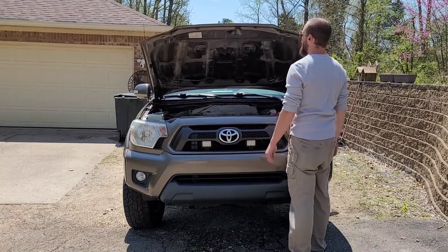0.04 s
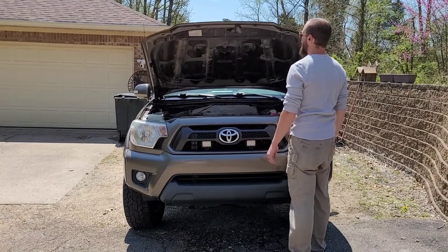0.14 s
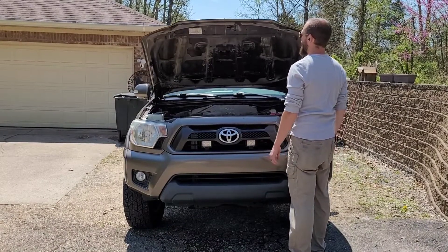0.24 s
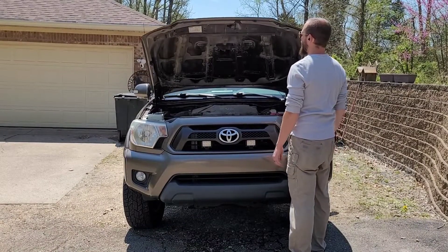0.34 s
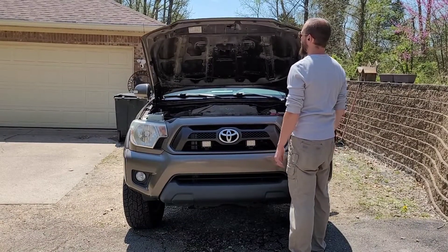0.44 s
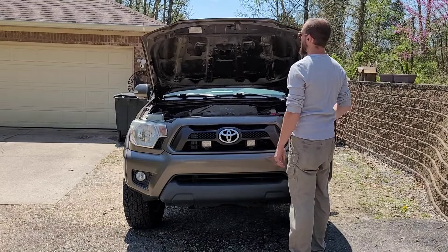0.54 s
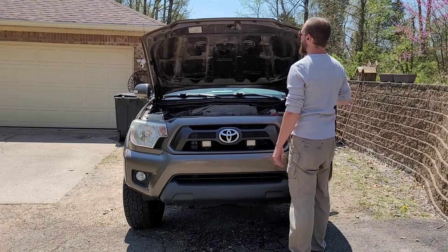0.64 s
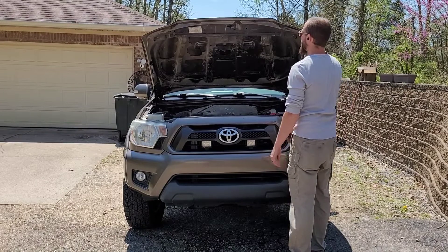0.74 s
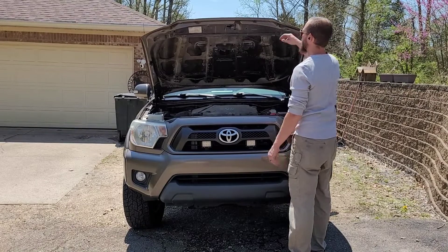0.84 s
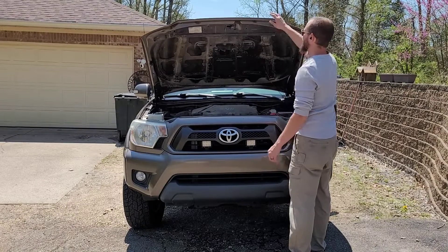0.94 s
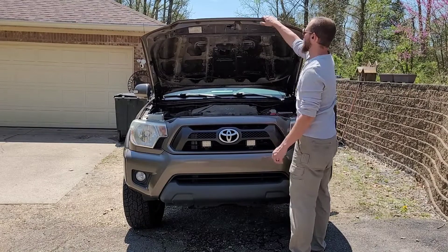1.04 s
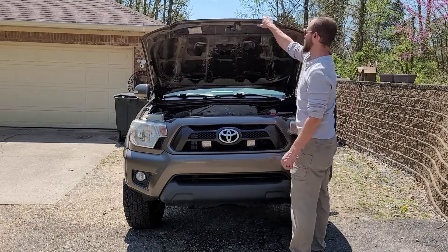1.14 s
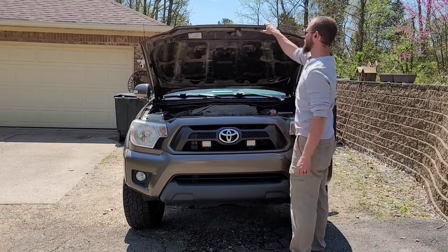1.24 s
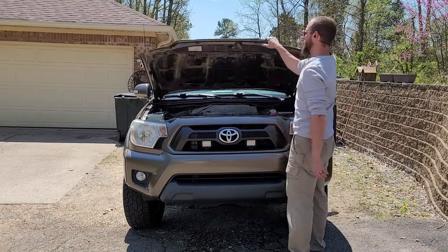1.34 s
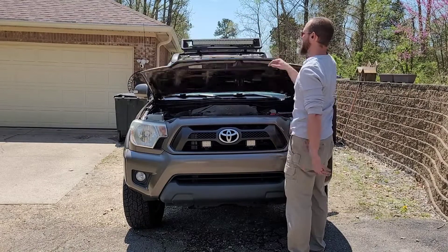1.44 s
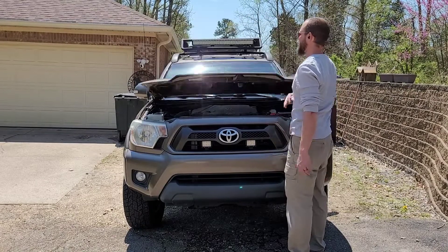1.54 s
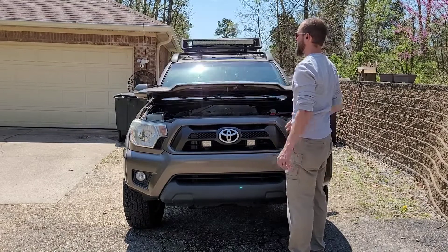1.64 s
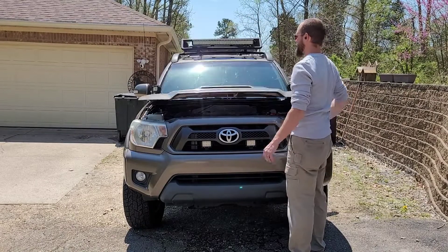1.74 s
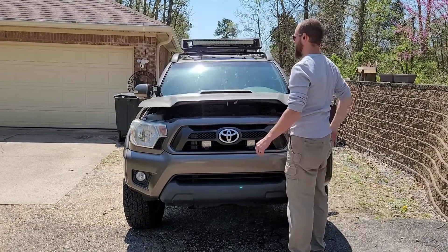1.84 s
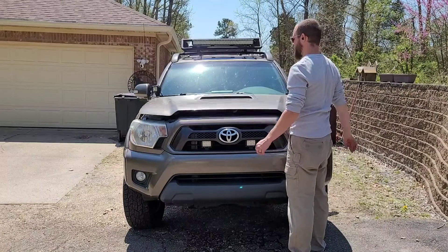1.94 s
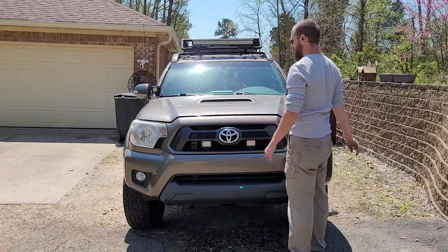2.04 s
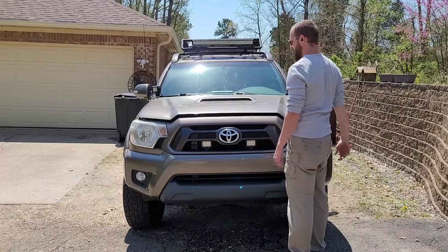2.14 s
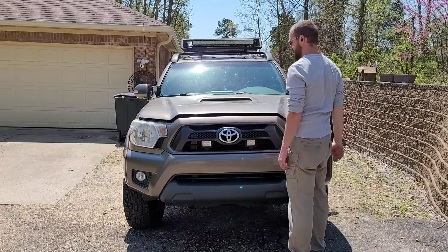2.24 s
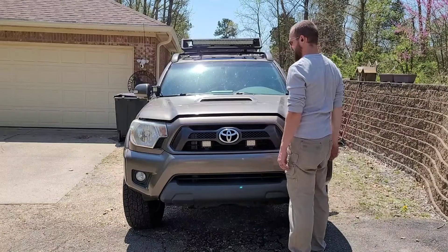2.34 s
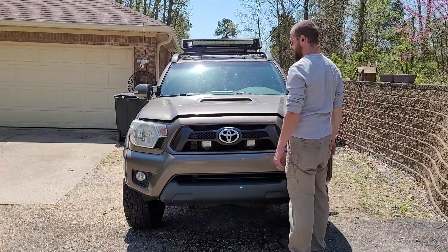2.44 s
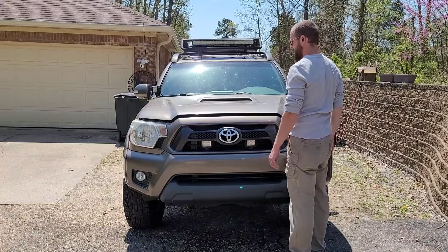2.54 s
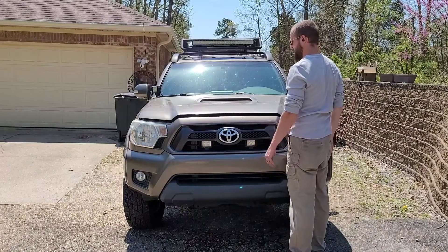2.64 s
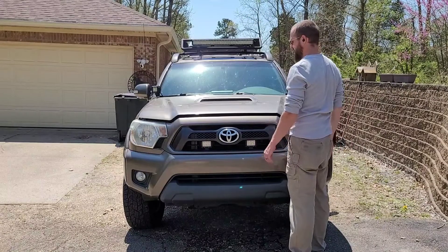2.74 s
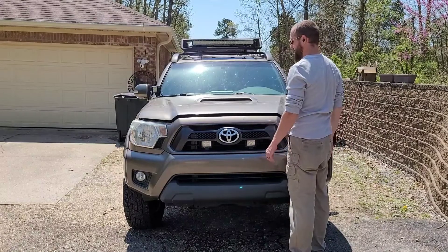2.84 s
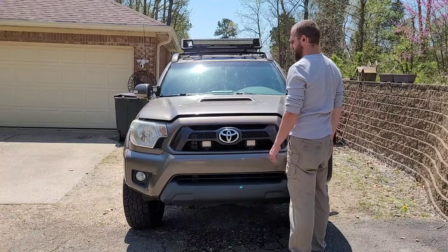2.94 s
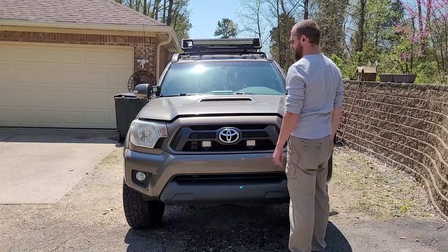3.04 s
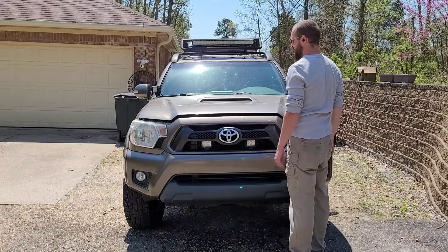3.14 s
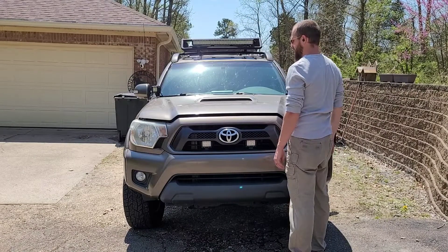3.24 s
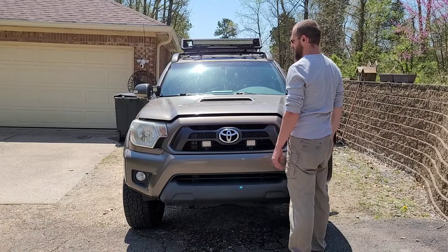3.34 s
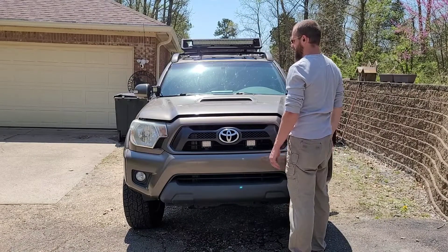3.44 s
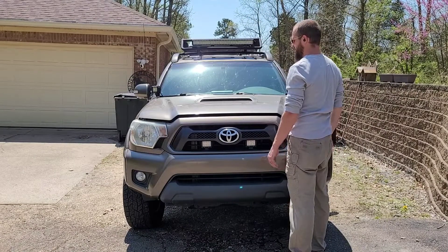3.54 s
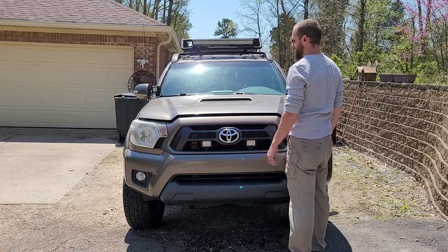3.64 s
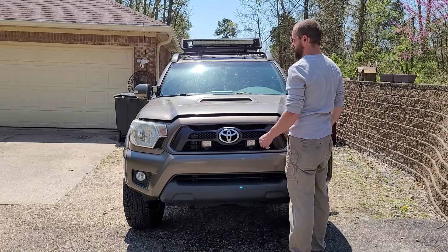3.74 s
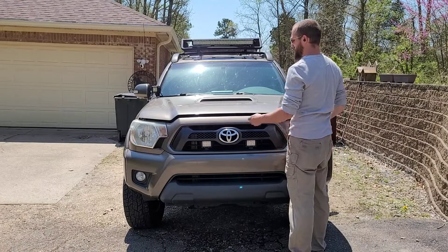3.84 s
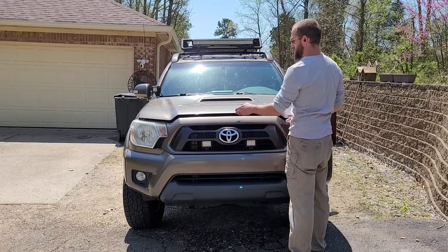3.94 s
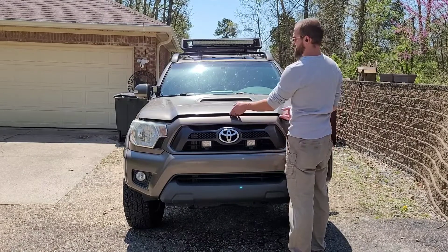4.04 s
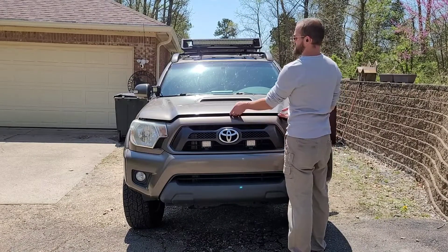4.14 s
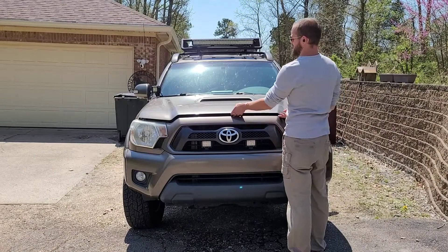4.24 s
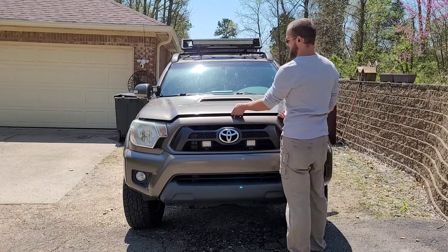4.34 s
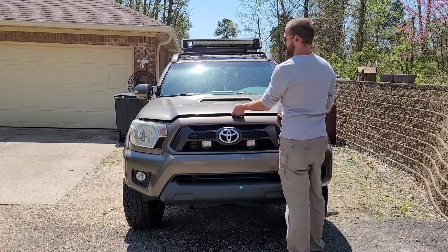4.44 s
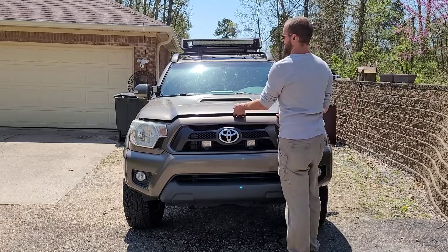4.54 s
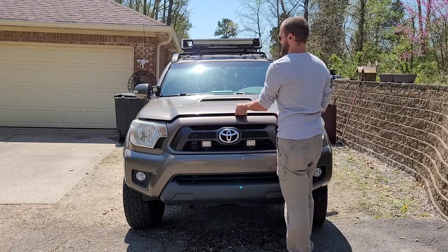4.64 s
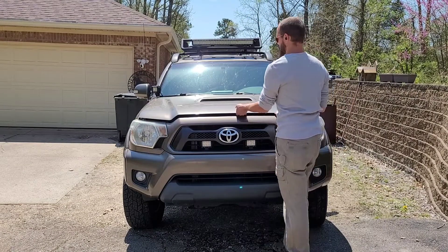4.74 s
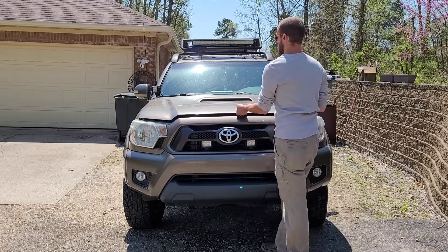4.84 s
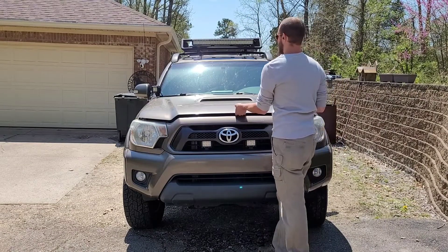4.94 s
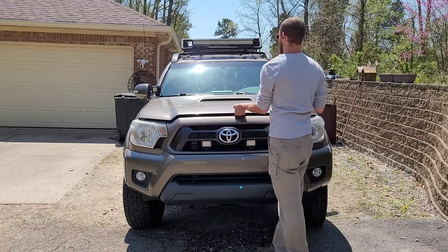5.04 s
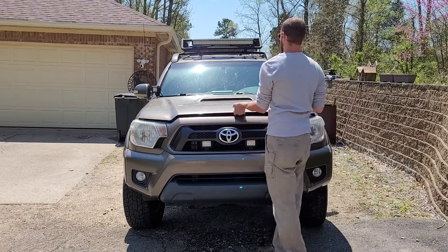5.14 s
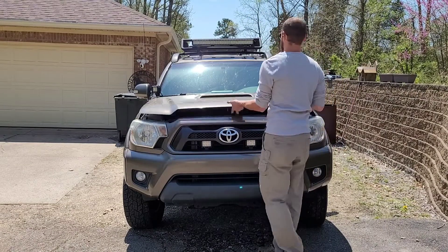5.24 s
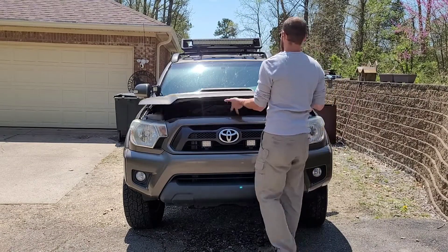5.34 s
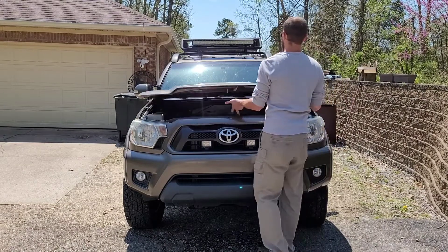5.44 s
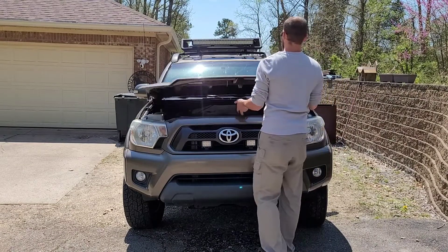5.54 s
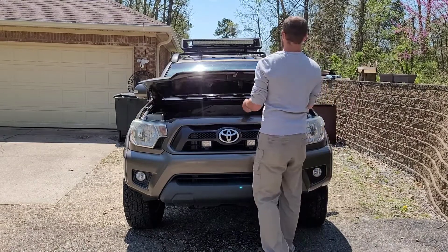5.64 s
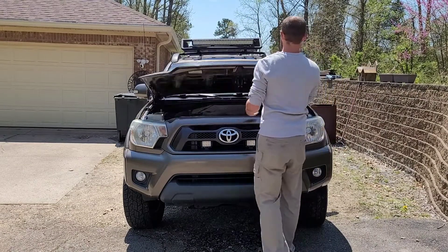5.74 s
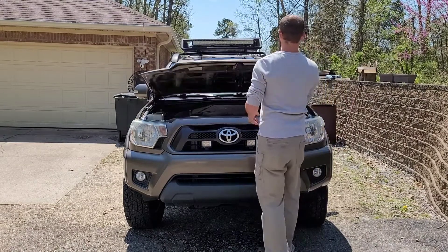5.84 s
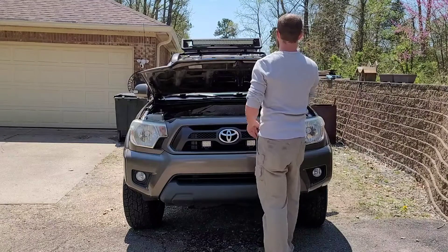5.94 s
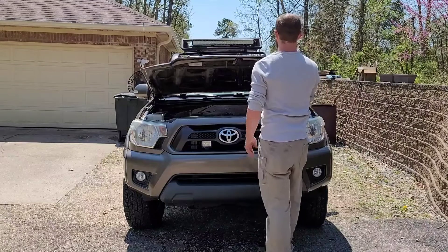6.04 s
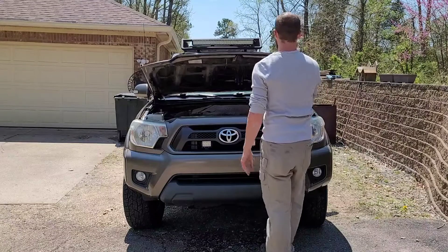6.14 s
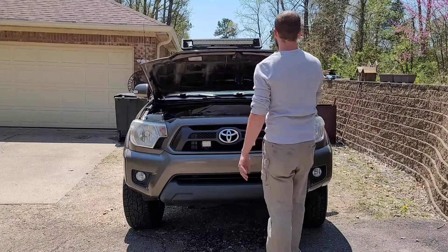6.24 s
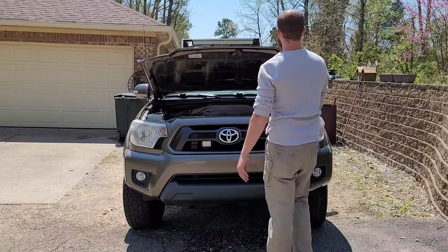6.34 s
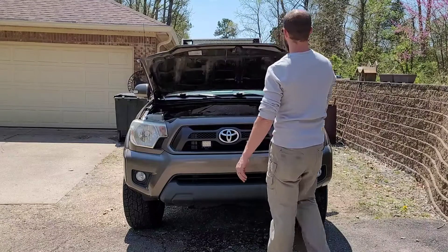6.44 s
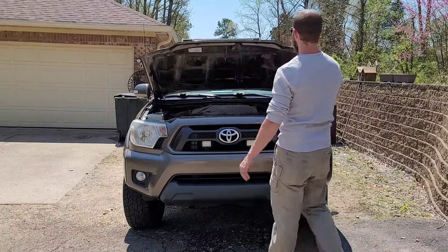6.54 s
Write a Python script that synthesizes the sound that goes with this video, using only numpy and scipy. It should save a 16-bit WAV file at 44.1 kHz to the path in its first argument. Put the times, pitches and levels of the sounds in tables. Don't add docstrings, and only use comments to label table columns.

```python
import sys
import numpy as np
from scipy import signal
from scipy.fft import rfft, irfft, next_fast_len
from scipy.io import wavfile
from scipy.ndimage import uniform_filter1d

SR = 44100
rng = np.random.default_rng(int(sys.argv[2]) if len(sys.argv) > 2 else 0)


def invert_db(level):
    return 10 ** (np.asarray(level, dtype=float) / 20)


def output_pcm(signal):
    pcm = np.clip(np.atleast_2d(signal).T, -1, 1) * 32767
    wavfile.write(sys.argv[1], SR, np.round(pcm).astype(np.int16))


N = 291314

BANDS_HZ = 22 * 2 ** np.arange(0, 9.6, 1 / 2)
# pitch_hz, likeness (1 = same, -1 = opposed)
ALIKE_NEAR = [(30, .97), (150, .95), (290, .85), (560, .2), (1400, .45), (3100, .55), (7000, .75),
              (16000, .85)]


def on_log(table, hz):
    f, v = np.transpose(table)
    return np.interp(np.log(hz), np.log(f), v)


def walk(rate):
    k = int(SR / rate)
    held = np.repeat(rng.standard_normal(N // k + 1), k)
    return 1.3 * uniform_filter1d(uniform_filter1d(held, k), k)[:N]


def band_noise():
    size = next_fast_len(N)
    hz = np.maximum(np.arange(size // 2 + 1) * SR / size, 1.)
    white = rfft(rng.standard_normal((2, size))) * np.sqrt(SR / 2)
    shape = [np.cos(np.pi / 2 * np.clip(2 * np.log2(hz / c), -1, 1)) for c in BANDS_HZ]
    return np.array([irfft(s * white, size)[:, :N] for s in shape])


def ports(bands, alike):
    like = np.clip(on_log(alike, BANDS_HZ), -1, 1)[:, None]
    mid = bands[:, 0] * np.sqrt((1 + like) / 2)
    side = bands[:, 1] * np.sqrt((1 - like) / 2)
    return np.stack([mid + side, mid - side], axis=1)


def coloured(noise, colour, flicker_db, rate):
    out = sum(invert_db(on_log(colour, hz) + flicker_db * walk(rate)) * n for hz, n in zip(BANDS_HZ, noise))
    return out / np.sqrt(np.mean(out ** 2))


def swells(start_s, hold_s, fade_db_s, db, still_db):
    t = np.arange(N)[:, None] / SR
    away_s = np.maximum(start_s - t, 0) + np.maximum(t - start_s - np.abs(hold_s), 0)
    return np.sqrt((invert_db(db - fade_db_s * away_s) ** 2).sum(axis=1) + invert_db(still_db) ** 2)


def pan(pan_db):
    return invert_db(np.array([[pan_db], [-pan_db]]) / 2)


def decay(t, t60):
    return np.exp(-np.log(1000) * t / t60)


def rattle_contacts(rattle_s, scatter_db, first):
    count = 7000
    chance = rng.random((3, count))
    u = np.arange(count) / SR / max(rattle_s, .0002)
    uneven = invert_db(-scatter_db * np.log(chance[2] + 0.0057))
    contacts = (chance[0] < .03) * np.sign(chance[1] - .5) * uneven
    contacts[0] = 1
    contacts = contacts * (u + first) * np.exp(-2 * u) * (u < 4)
    return contacts / np.sqrt(np.sum(contacts ** 2))


def blows(noise, events, colour, ring, modes, modes_db, scatter_db, first, pan_db, rattle=0., soft=0.):
    out, t = np.zeros((2, N)), np.arange(int(.6 * SR)) / SR
    fade = decay(t, np.maximum(on_log(ring, BANDS_HZ), .004)[:, None])
    fade = fade * (1 - np.exp(-(t + 1 / SR) * BANDS_HZ[:, None] * 5.8))
    splits_hz = [250, 3000]
    part = np.digitize(BANDS_HZ, splits_hz)
    for s, db, bass_db, treble_db, *drag_s in events:
        rattle_s = drag_s[0] if drag_s else rattle * invert_db(-soft * treble_db)
        start = rng.integers(0, N - len(t))
        grains = noise[:, :, start:start + len(t)]
        dense = invert_db(on_log(colour, BANDS_HZ))[:, None, None] * fade[:, None] * grains
        body = np.array([dense[part == k].sum(axis=0) for k in range(3)])
        size = np.sqrt(np.mean(body.sum(axis=0)[:, :800] ** 2))
        rings = np.zeros_like(body)
        for (hz, mode_db, t60), (tune, phase, lead) in zip(modes, rng.standard_normal((len(modes), 3))):
            out_of_step = np.array([[1], [-1]]) * lead * (1 - on_log(ALIKE_NEAR, hz))
            turn = 2 * np.pi * hz * (1 + 0.0034 * tune) * t + phase + out_of_step
            rings[np.digitize(hz, splits_hz)] += size * invert_db(mode_db + modes_db) * np.sin(turn) * decay(t, t60)
        contacts = rattle_contacts(rattle_s, scatter_db, first)
        sound = signal.fftconvolve(body, contacts[None, None], axes=2)[:, :, :len(t)]
        sound = sound + rings * (1 - np.exp(-t / rattle_s * 3.4))
        peak = np.sqrt(uniform_filter1d(sound.mean(axis=1) ** 2, size=400, axis=1).max(axis=1))
        sound = np.tensordot(invert_db(db + np.array([bass_db, 0, treble_db])) / peak, sound, axes=1)
        i = int(s * SR)
        out[:, i:i + len(t)] += (sound * pan(pan_db))[:, :N - i]
    return out


def glides(table, rough, overtones_db=(0,), wobble=0.034, flutter_db=3.5, lead=0., trill_depth=0.):
    trill_per_s = 47
    out, drift, flutter, rasp = np.zeros((2, N)), walk(150), walk(50), walk(400)
    for s, length, first_hz, last_hz, db in table:
        i, u = int(s * SR), np.linspace(0, 1, int(length * SR))
        at = slice(i, i + len(u))
        hz = (last_hz + (first_hz - last_hz) * (1 - u) ** 1.8) * (1 + wobble * rough * drift[at])
        hz = hz * (1 - trill_depth * np.cos(2 * np.pi * trill_per_s * length * u))
        unsteady = (rough + 0.5965) * flutter[at] + rough * rasp[at]
        gain = np.sqrt(2) * np.sin(np.pi * u) ** .5 * invert_db(db + flutter_db * unsteady)
        turn = 2 * np.pi * np.cumsum(hz) / SR
        for k, over_db in enumerate(overtones_db):
            out[:, at] += gain * invert_db(over_db) * np.sin((k + 1) * turn + [[lead], [0]])
    return out


def scattered(x, noise, pan_db, wet_db, t60):
    t = np.arange(int(.7 * SR)) / SR
    damped = t60 * np.minimum(2500 / BANDS_HZ, 1)[:, None, None] ** 0.31
    echo = (noise[:, :, :len(t)] * decay(t, damped)).sum(axis=0) * np.minimum(t / 0.014, 1)
    echo = echo / np.sqrt((echo ** 2).sum(axis=1, keepdims=True))
    echo = signal.fftconvolve(x[:1], echo, axes=1)[:, :N]
    return x * pan(pan_db) + invert_db(wet_db) * echo


def hood_slam(noise):
    # start_s, level_db (peak 250-3000 Hz), bass_db below it, treble_db above it
    catch_hits = [
        (1.955, -20, -19, -9),
        (1.966, -20.5, -15, -12),
    ]
    slam_hits = [(1.982, -14.5, -14, -1), (1.992, -12, -8.5, -7.5), (2.003, -14.5, -5.5, -12.5),
                 (2.015, -17.5, -4, -12.5), (2.031, -25.5, 4, -16.5), (2.054, -25, -9.5, -10.5),
                 (2.074, -25, -7, -6.5), (2.09, -29.5, -2, -12.5)]
    rebound_hits = [
        (2.158, -25, -6, -3.5),
        (2.168, -26.5, -2, -9.5),
        (2.19, -29.5, -1.5, -19.5),
        (2.222, -34, 0, -20),
        (2.246, -37, 5, -19),
    ]
    # pitch_hz, level_db per Hz; then pitch_hz, t60_s
    steel_colour = [(25, -14), (98, -6.5), (300, -17.5), (380, -6), (620, -17), (950, -7.5), (1400, -13),
                    (3980, -17.5), (6800, -33), (9000, -22.5), (16000, -43)]
    steel_ring = [(40, 0.21), (150, .5), (700, 0.15), (1500, 0.12), (5000, 0.033), (15000, 0.046)]
    # pitch_hz, level_db, t60_s
    catch_modes = [(380, 6.5, 0.21), (486, 0.5, .1), (1310, 5, .12), (3920, -1.5, 0.1), (5550, -8, .05)]
    slam_modes = [(60, 3, 0.25), (98, 1, 0.3), (146, 0, 0.5), (377.7, 10, .16), (470, 0, 0.18),
                  (541, -1, 0.16), (889, -1, .3), (1030, -1, .15), (1640, -5, .1), (2250, -6, .08),
                  (3490, -10, .1), (8420, -17, .05), (9450, -16, .06), (11800, -18, .06)]
    rebound_modes = [(100.6, -2.5, 0.27), (144.8, -1, 0.46), (368, 7.5, 0.31), (469, -4, .3),
                     (618.3, -3.5, .1), (752, -3, 0.28), (896, 3.5, 0.24), (980, -6, 0.34),
                     (1076, -18, 0.35), (1385, -13, 0.33), (1575, -11.5, 0.12), (2300, -8, 0.07)]
    slam = blows(noise, slam_hits, steel_colour, steel_ring, slam_modes, modes_db=-6.0,
                 scatter_db=1.5, first=0.13, rattle=0.0083, soft=0.12, pan_db=-0.14)
    catch = blows(noise, catch_hits, steel_colour, steel_ring, catch_modes, modes_db=-5.0,
                  scatter_db=2.5, first=0.14, rattle=0.0053, pan_db=0.46)
    rebound = blows(noise, rebound_hits, steel_colour, steel_ring, rebound_modes, modes_db=-4.0,
                    scatter_db=2.5, first=0.11, rattle=.007, soft=.3, pan_db=0.57)
    return slam + catch + rebound


def far_thud(noise):
    # start_s, level_db (peak 250-3000 Hz), bass_db below it
    thud_hits = [
        (0.294, -44, -9),
        (0.304, -35.5, -13),
        (0.321, -33.5, -4.5),
        (0.372, -38.5, 0.5),
        (0.429, -48.5, 3.5),
    ]
    # pitch_hz, level_db per Hz; pitch_hz, t60_s; modes pitch_hz, level_db, t60_s
    thud_colour = [(18, -26), (30, 5.5), (134, 0.5), (239, -8), (328, -8), (760, -18.5), (988, -16),
                   (2170, -30.5), (2610, -39), (16000, -131)]
    thud_ring = [(40, 0.7), (300, 0.57), (1500, 0.39), (15000, 0.071)]
    thud_modes = [(49.3, -1, 1), (91.3, -2, 0.37), (330.6, 5, 0.15), (610, -14.5, 0.37), (949, -13.5, 0.27),
                  (1340, -2, 0.068), (1725, -6.5, 0.044)]
    treble_db = -33.5
    return blows(noise, [(*row, treble_db) for row in thud_hits], thud_colour, thud_ring, thud_modes,
                 modes_db=0.5, scatter_db=1.5, first=0.066, rattle=0.013, pan_db=0.0)


def hood_pull(noise):
    # start_s, level_db (peak 250-3000 Hz), bass_db, treble_db
    pull_hits = [
        (1.061, -35, -8, -18),
        (1.071, -30, -13, -24.5),
        (1.082, -30, -21, -26.5),
        (1.149, -46, -5, -56),
    ]
    # pitch_hz, level_db per Hz; pitch_hz, t60_s; modes pitch_hz, level_db, t60_s
    pull_colour = [(18, -37), (30, -9), (184, -23), (227, -19), (273, -11), (554, -3.5), (937, -13),
                   (1430, -13.5), (1910, -21.5), (16000, -37.5)]
    pull_ring = [(40, 0.61), (600, 0.32), (1500, 0.21), (4000, 0.079), (15000, 0.1456)]
    pull_modes = [(285, -11, 0.25), (538, -4.5, 0.13), (689, 4, 0.26), (1200, -15, 0.083), (1292, -2, 0.15),
                  (1460, -4.5, 0.098), (3960, -1.5, 0.061)]
    return blows(noise, pull_hits, pull_colour, pull_ring, pull_modes, modes_db=2.0,
                 scatter_db=1.5, first=0.076, rattle=0.0045, soft=0.29, pan_db=0.5)


def latch_work(noise):
    # start_s, level_db (peak 250-3000 Hz), bass_db, treble_db
    clunk_hits = [
        (4.95, -40, -15.5, -21),
        (4.976, -51.5, 3, -35),
        (5.094, -44.5, -0.5, -17.5),
        (5.119, -53, -4, -19),
    ]
    latch_hits = [
        (5.467, -25, -9.5, -13.5),
        (5.475, -22.5, -13, -21),
        (5.487, -28, -9, -22),
        (5.51, -41.5, 8, -33),
    ]
    # pitch_hz, level_db per Hz (clunk, release); pitch_hz, t60_s; modes pitch_hz, level_db, t60_s
    clunk_colour = [(40, -20), (100, -8), (200, -12), (350, 0), (900, -2), (2500, -6), (4500, -19),
                    (16000, -42)]
    latch_colour = [(40, -35), (100, -22), (230, -9), (420, -1), (800, -12), (1300, -8), (2900, -9),
                    (4600, -24), (16000, -36)]
    latch_ring = [(40, 0.47), (300, 0.36), (1000, 0.084), (4000, 0.036), (15000, 0.074)]
    latch_modes = [(229, -2, .2), (317, -6, .15), (413, 4, .12), (488, 2, .14), (535, 2, .24),
                   (691, 0, .11), (1298, -7, .09), (2093, -8, .07), (2882, -8, .08), (3820, -16, .05),
                   (6700, -22, .15)]
    clunk = blows(noise, clunk_hits, clunk_colour, latch_ring, latch_modes, modes_db=-3.5,
                  scatter_db=3.0, first=0.31, rattle=0.017, pan_db=-1.0)
    release = blows(noise, latch_hits, latch_colour, latch_ring, latch_modes, modes_db=0.0,
                    scatter_db=2.5, first=0.054, rattle=0.0071, pan_db=-1.5)
    return clunk + release


def fingers_and_hinges(noise):
    # start_s, level_db (peak 250-3000 Hz), treble_db above it
    finger_taps = [(4.017, -52.5, -23.5), (4.096, -64, -24.5), (4.177, -46.5, -20.5), (4.19, -42, -8.5),
                   (4.219, -53, -37), (4.452, -58.5, -0.5), (4.472, -49.5, -12), (4.524, -56, -16),
                   (4.555, -55, -7), (4.608, -58, -8.5), (5.237, -60.5, -3.5), (5.263, -65, 0.5),
                   (5.385, -57.5, 2.5), (5.402, -51, 2.5), (5.441, -57, 4.5), (5.618, -62.5, -2.5)]
    # start_s, level_db (peak 250-3000 Hz), bass_db, treble_db, drag_s
    drags = [
        (0.669, -62.5, -12, -13.5, 0.018),
        (1.364, -50.5, -23, -2.5, 0.05),
        (1.402, -50.5, -13, -13, 0.047),
        (1.496, -55.5, -16, -30, 0.028),
        (4.822, -69, -1, -11.5, 0.054),
        (5.72, -62.5, -2, -7.5, 0.072),
        (6.329, -66, -10, -4, 0.015),
    ]
    # pitch_hz, level_db per Hz (fingers, drags); pitch_hz, t60_s; modes pitch_hz, level_db, t60_s
    finger_colour = [(18, -45.5), (30, -32), (75, 26), (311, -21.5), (584, -1), (684, -18), (866, 1),
                     (1190, -21), (2750, 1), (16000, -29)]
    drag_colour = [(30, -13), (300, -11.5), (1000, -12.5), (1900, -4.5), (3500, -6.5), (8000, -19.5),
                   (16000, -16)]
    finger_ring = [(40, 0.44), (600, 0.087), (3000, 0.012), (15000, 0.011)]
    finger_modes = [(557.4, 0.5, 0.13), (868, -3.5, 0.11), (1402, 12, 0.032), (2704, 7.5, 0.045),
                    (3840, 5.5, 0.038)]
    bass_db = -69
    touches = [(s, db, bass_db - db, treble_db) for s, db, treble_db in finger_taps]
    dragging = blows(noise, drags, drag_colour, finger_ring, [], modes_db=0,
                     scatter_db=2.0, first=0.097, pan_db=0.37)
    tapping = blows(noise, touches, finger_colour, finger_ring, finger_modes, modes_db=-16.0,
                    scatter_db=3.5, first=0.26, rattle=0.0153, soft=0.034, pan_db=0.0)
    return dragging + tapping


def gravel(noise):
    # start_s, level_db (peak 250-3000 Hz), bass_db, treble_db
    stone_hits = [
        (6.539, -54, -5.5, -7),
        (6.543, -58, 18, 1),
        (6.563, -53.5, -1, -2),
        (6.5691, -57.5, 11, 17.5),
        (6.577, -60.5, 12.5, 16),
    ]
    # pitch_hz, level_db per Hz; pitch_hz, t60_s
    stone_colour = [(18, -25.5), (30, 10), (199, -33), (1320, -29), (1720, -31), (8980, -13), (16000, -29)]
    stone_ring = [(40, 0.17), (1000, 0.028), (4000, 0.0072), (15000, 0.0016)]
    return blows(noise, stone_hits, stone_colour, stone_ring, [], modes_db=0,
                 scatter_db=3.0, first=0.87, rattle=0.0078, soft=1.0, pan_db=-5.5)


def struts_and_bird_call():
    # start_s, length_s, first_hz, last_hz, level_db (rms)
    squeaky_calls = [
        (4.095, .085, 1120, 1170, -67),
        (4.38, .1, 1130, 1160, -78),
    ]
    groans = [(1.4, .16, 1190, 1140, -57), (1.58, .05, 1130, 1130, -65), (1.5, .13, 770, 760, -62),
              (1.37, .09, 1800, 1760, -58), (1.47, .07, 2050, 1930, -63), (1.24, .07, 2900, 2950, -67),
              (1.39, .09, 3300, 3260, -65), (1.52, .08, 3800, 3780, -70), (1.21, .06, 1320, 1310, -63),
              (1.2, .08, 2580, 2620, -69), (4.82, .05, 1750, 1751, -73), (4.52, .04, 850, 840, -62),
              (4.6, .035, 1080, 1070, -68), (4.2, .06, 580, 620, -59), (5.51, .11, 2830, 2810, -62),
              (5.66, .04, 2810, 2810, -70), (5.52, .07, 1600, 1660, -63), (5.61, .05, 2200, 2030, -67),
              (5.68, .06, 2050, 2030, -72), (5.66, .06, 1640, 1640, -71), (5.74, .05, 3150, 3300, -70)]
    call_overtones_db = [-4, 4, -2, -36]
    return glides(squeaky_calls, 0.34, call_overtones_db) + glides(groans, rough=.2)


def truck(noise):
    hits = hood_slam(noise) + far_thud(noise) + hood_pull(noise)
    hits = hits + latch_work(noise) + fingers_and_hinges(noise) + gravel(noise)
    return scattered(hits + struts_and_bird_call(), noise, pan_db=-0.5, wet_db=-20, t60=0.4)


def whistling_birds():
    # start_s, length_s, first_hz, last_hz, level_db (rms)
    chirps = [(.0, .2, 2460, 2760, -59), (.0, .13, 2330, 2560, -63), (.0, .07, 1020, 1021, -62),
              (.04, .12, 1880, 2050, -65), (.235, .03, 3530, 3550, -65), (.39, .09, 2620, 2720, -62),
              (.52, .09, 2040, 2050, -70), (.03, .04, 2930, 2920, -70), (2.75, .04, 3100, 3400, -74),
              (3.04, .03, 3280, 3350, -76), (3.05, .07, 2950, 3000, -75), (3.07, .04, 2600, 2500, -74),
              (4.13, .04, 2780, 2850, -65), (4.08, .04, 2550, 2560, -70), (3.69, .04, 2230, 2230, -72)]
    # start_s, level_db (rms)
    whistle_shape = (.25, 2280, 2770)
    whistle_calls = [
        (.29, -58),
        (2.3, -66),
        (2.65, -65),
    ]
    low_shape = (.09, 1430, 1720)
    low_calls = [
        (2.35, -72),
        (2.65, -73),
        (2.94, -72),
    ]
    # start_s (after its beginning), length_s, first_hz, last_hz, level_db (rms)
    phrase_notes = [
        (0, .11, 2500, 2620, -77),
        (.04, .07, 3330, 3480, -72),
        (.1, .055, 3380, 3540, -68),
        (.12, .035, 2900, 3020, -81),
        (.18, .07, 2920, 3030, -73),
        (.24, .06, 2250, 2240, -74),
    ]
    repeats_db = [-5.5, -3.5, 1, 2.5, 2]
    phrase_start_s, phrase_every_s = 3.138, .298
    phrases = []
    for k, loud_db in enumerate(repeats_db):
        for s, *shape, db in phrase_notes:
            phrases.append((phrase_start_s + k * phrase_every_s + s, *shape, db + loud_db))
    calls = [(s, *whistle_shape, db) for s, db in whistle_calls]
    calls = calls + [(s, *low_shape, db) for s, db in low_calls] + chirps
    return (invert_db(3.5) * glides(calls, rough=0.13, wobble=0.079, lead=2.15)
            + invert_db(3.0) * glides(phrases, rough=0.303, wobble=0.0575, lead=1.5))


def trilling_birds():
    # start_s, length_s, first_hz, last_hz, level_db (rms)
    trilled = [
        (3.06, .13, 1350, 1450, -72),
        (3.19, .13, 1480, 1530, -68),
        (3.09, .14, 1850, 1930, -64),
        (3.15, .13, 1180, 1170, -76),
        (3.24, .17, 1980, 1990, -76),
        (3.3, .05, 1600, 1680, -72),
        (4.14, .26, 1380, 1500, -68),
    ]
    chatter = [
        (3.21, .14, 3000, 3030, -69),
        (4.21, .15, 3050, 2980, -60),
        (4.2, .14, 2300, 2050, -64),
        (4.34, .08, 1800, 1850, -68),
        (4.5, .09, 2900, 3000, -66),
        (4.36, .12, 3250, 3400, -68),
    ]
    return (invert_db(11.5) * glides(trilled, rough=0.27, wobble=0.077, flutter_db=6, lead=2.49, trill_depth=.06)
            + invert_db(-2.5) * glides(chatter, rough=0.52, wobble=0.072, lead=1.4))


def birds(noise):
    trees_t60_s, trees_db = .5, -7
    return (scattered(whistling_birds(), noise, pan_db=-1.5, wet_db=trees_db, t60=trees_t60_s)
            + scattered(trilling_birds(), noise, pan_db=0.5, wet_db=trees_db, t60=trees_t60_s))


def rustle(noise):
    # start_s, hold_s, fade_db_per_s (rise and fall), hiss_db (above 4.5 kHz), scrape_db
    movements = [
        (0.0, 0.36, 250, -74.5, -65.5),
        (1.28, 0.19, 66, -64.5, -62.5),
        (1.52, .1, 60, -74, -63),
        (2.117, .12, 219, -71, -46),
        (3.235, 0.097, 66, -100, -74),
        (4.308, 0.47, 26.5, -89.5, -67),
        (5.414, 0.28, 92, -70.5, -69.5),
        (6.401, 0.22, 19, -76.5, -66.5),
    ]
    # pitch_hz, level_db per Hz
    hiss_colour = [(2060, -22.5), (3500, -1), (4900, -7), (7320, -7.5), (8530, -4.5), (12400, -6),
                   (16000, -20.5)]
    scrape_colour = [(200, -28.0), (400, 2.5), (1000, 2.5), (2500, -4.5), (5000, -22.0), (8000, -43.0)]
    s, hold_s, fade, hiss_db, scrape_db = np.transpose(movements)
    fresh = noise[:, :, ::-1]
    grain = invert_db(2 * walk(90))
    hiss = coloured(fresh, [(2500, -40)] + list(hiss_colour), flicker_db=2.5, rate=25)
    scrape = coloured(fresh, scrape_colour, flicker_db=3.5, rate=24)
    hiss = swells(s, hold_s, fade, hiss_db, still_db=-97) * hiss
    scrape = swells(s, hold_s, fade * 0.6, scrape_db, still_db=-79) * scrape
    return grain * (hiss + scrape)


def yard(noise):
    # pitch_hz, level_db per Hz
    yard_colour = [(20, -14.5), (58, 1.5), (101, -2.5), (285, -16), (410, -9), (1000, -23), (2140, -32.5),
                   (2600, -22.5), (3840, -39), (5900, -39.5), (7110, -57.5), (13200, -45), (16000, -51.5)]
    # start_s, fade_db_per_s (rise and fall), level_db
    rumbles = [
        (.47, 77, -41.5),
        (1.27, 73, -50.5),
        (2.151, 152.5, -35),
        (5.13, 11.5, -53.5),
    ]
    # start_s, length_s, first_hz, last_hz, level_db (rms)
    hums = [
        (2.2, 1.9, 208, 210, -71),
        (5.6, .8, 210, 208, -71),
    ]
    rumble_colour = [(20, -12.0), (45, 8), (100, 6), (150, -12.5), (260, -54.5)]
    steady = invert_db(-59.5) * coloured(noise, yard_colour, flicker_db=1, rate=8.6)
    low = coloured(noise[:, :, ::-1], rumble_colour, flicker_db=3.0, rate=3.9)
    s, fade, db = np.transpose(rumbles)
    low = invert_db(-3.5) * swells(s, 0, fade, db, still_db=-67.5) * low
    return steady + low + glides(hums, rough=0.087)


def scene():
    # pitch_hz, likeness
    alike_far = [(60, 0.91), (130, 1), (290, 0.31), (640, -0.83), (1410, -0.86), (3100, -0.28),
                 (6820, 0.24), (15000, 0.22)]
    bands = band_noise()
    near, wide = ports(bands, ALIKE_NEAR), ports(bands, alike_far)
    return truck(near) + birds(wide) + rustle(near) + yard(wide)


def band_limit(x):
    return signal.sosfilt(signal.butter(12, 16150, fs=SR, output="sos"), x)


def record(dry):
    rounded = np.tanh(1.03 * dry) / 1.108
    top = signal.ellip(8, .2, 70, 16300, fs=SR, output="sos")
    mix = signal.sosfilt(top, rounded)
    return band_limit(mix)


dry = scene()
out = record(dry)
output_pcm(out)
```